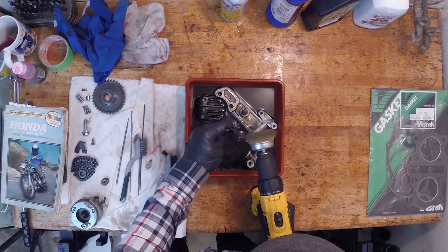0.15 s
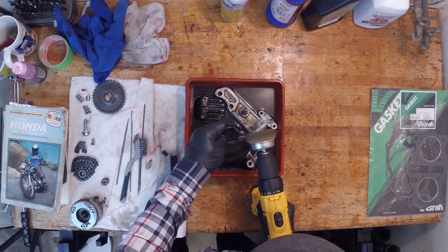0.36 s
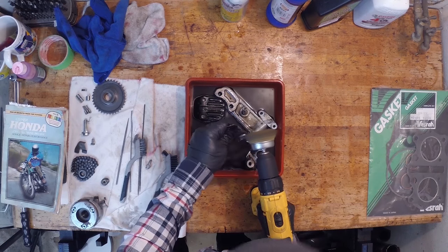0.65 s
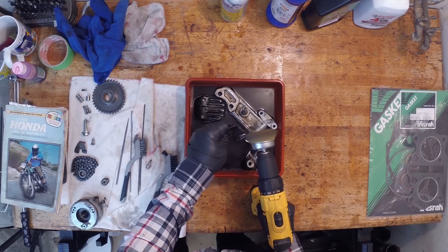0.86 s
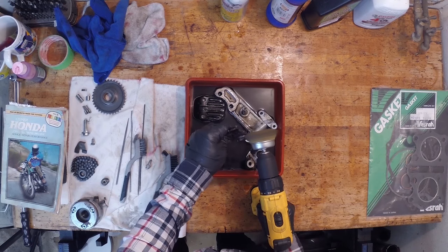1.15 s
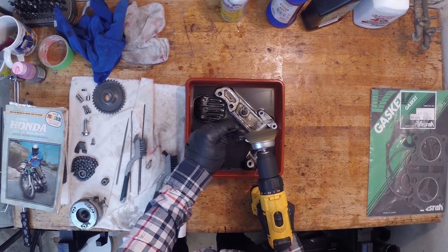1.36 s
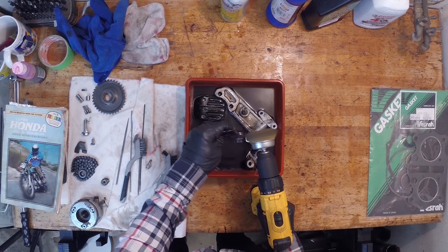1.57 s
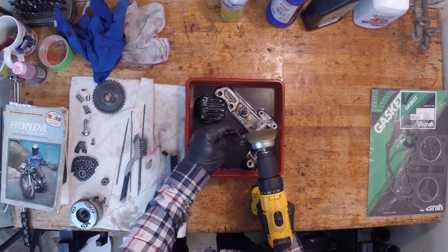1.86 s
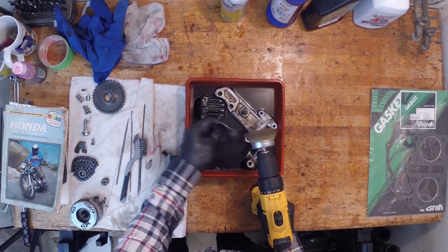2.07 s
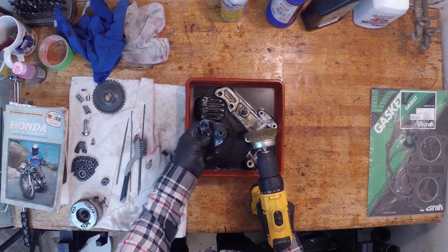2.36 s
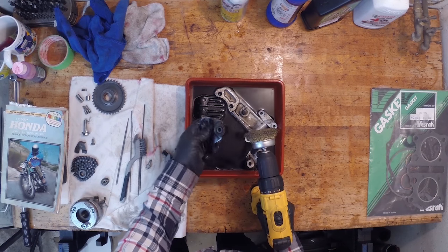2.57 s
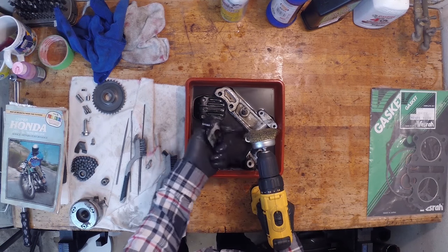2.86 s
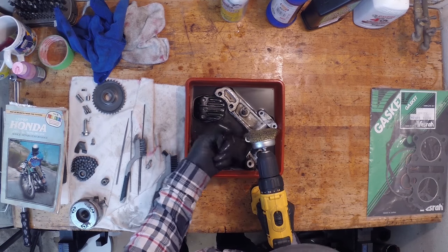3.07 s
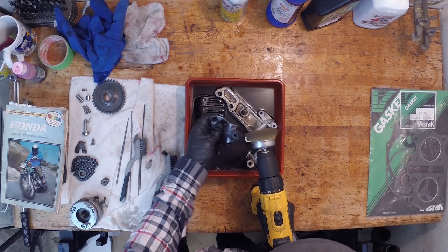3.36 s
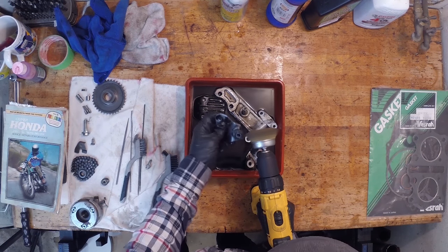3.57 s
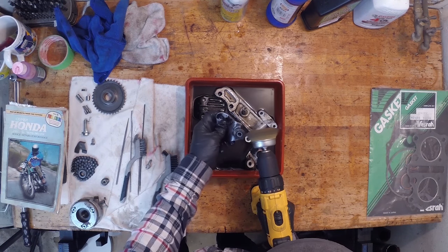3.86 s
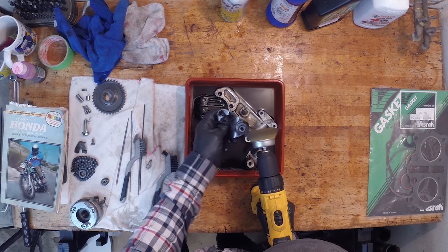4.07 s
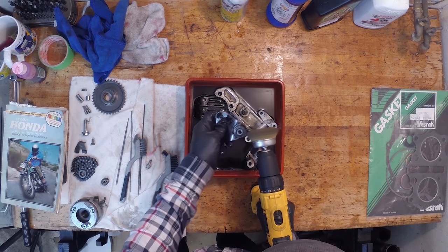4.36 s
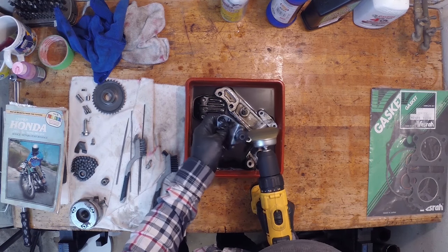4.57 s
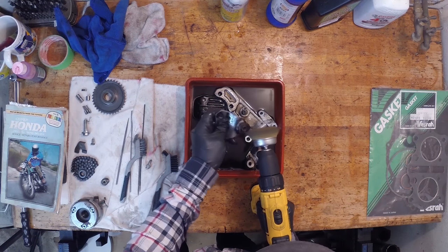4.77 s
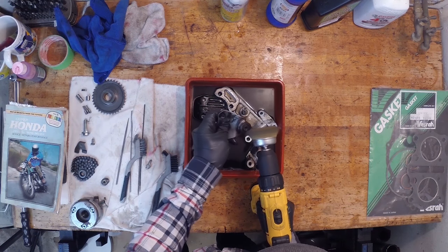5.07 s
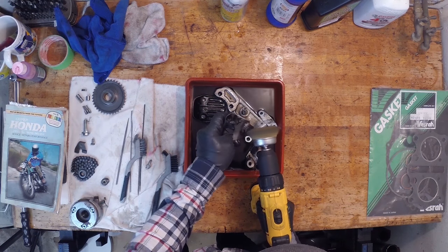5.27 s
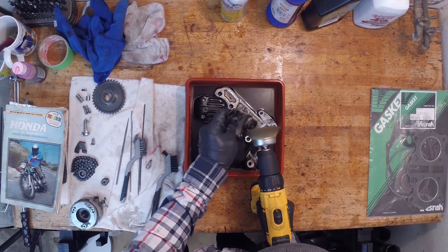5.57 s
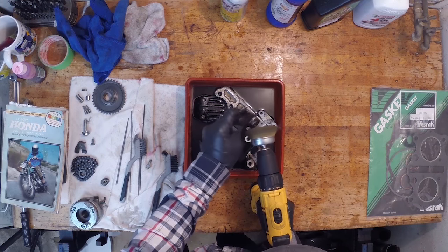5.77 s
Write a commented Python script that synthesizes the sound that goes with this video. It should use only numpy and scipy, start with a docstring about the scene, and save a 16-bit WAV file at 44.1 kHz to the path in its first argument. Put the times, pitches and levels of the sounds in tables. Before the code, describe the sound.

From 0 to about 2.4 seconds a cordless drill is already running at a steady speed, heard close in a small workshop with short reflections. Its gearbox gives a coarse, hollow midrange rattle with thin whining tones, the whine more prominent from about 1.5 seconds. Wire bristles scratch steel in a dense bright hiss with a metallic ring, and the off-centre brush throbs low through the wooden bench about nineteen times a second. At 2.38 the pitch falls almost instantly, ending in a loud sharp clack and a rapid clatter of smaller knocks until 2.45. The pause holds only low rumble, soft glove rubs near 2.9 and 3.2, and faint metal taps and clicks. At 3.41 the drill surges up quickly with small wire pings and a brief grinding whine, then runs steadily to about 6 seconds, dipping slightly in pitch as the part is pressed harder, the gear whine rising again near the end.

```python
"""In a workshop, a cordless drill spins a wire cup brush against a small steel part over a wooden bench.
Gear teeth rattle as tiny random knocks, the motor and gears whine as tones locked to its speed, wire tips
scratch as dense flicks, and the off-centre brush thumps the bench once a turn, as noise through the bench's tones.
The trigger is let go and the spindle lock clacks in short runs of contacts. After about a second of soft rubs
and small taps, the drill spins up again with a few wire pings. A low rumble lies under it all."""
import sys
import numpy as np
from scipy import signal
from scipy.fft import rfft, irfft
from scipy.io import wavfile
from scipy.ndimage import uniform_filter1d, minimum_filter1d

SR = 44100
rng = np.random.default_rng(int(sys.argv[2]) if len(sys.argv) > 2 else 0)


def dump_mix(stems):
    """Bounce the given channels to the path in sys.argv[1] as a 16-bit WAV at rate SR."""
    frames = np.atleast_2d(stems).T  # one column per channel
    limited = np.clip(frames, -1, 1)  # hard clip at full scale
    pcm = np.round(limited * 32767).astype(np.int16)
    wavfile.write(sys.argv[1], SR, pcm)


N = 260658
TIME = np.arange(N) / SR  # seconds

# All colour tables give relative levels: the sound is set to its own loudness afterwards.
# Motor and trigger: let go, the speed falls evenly; pulled again, it rises through two equal lags,
# finger and inertia.
FREE_HZ = 289.3  # motor turns a second without load
GEAR_RATIO = 15  # motor turns for one turn of the chuck
MESH_TEETH = 12  # tooth meetings in one motor turn
RELEASE_S, BRAKE_S = 2.375, .07
RESTART_S, SPIN_UP_S = 3.411, .039
# How hard the part is held to the brush, as lost motor speed, and the gear mesh tone before a small lift.
# Columns: time_s, sag_turns_per_s, mesh_db
LOAD_OVER_TIME = [(0.0, 0.6, -47), (0.22, 0.8, -43), (0.47, 1.6, -46), (0.95, 0.8, -46), (1.03, 0.8, -41),
                  (1.42, 1.8, -35), (1.55, 2.8, -35), (2.34, 0.7, -35), (3.75, 0.2, -46), (4.16, 0.6, -45),
                  (4.36, 1.4, -42), (4.86, 2.5, -47), (5.03, 5.0, -45), (5.13, 2.3, -46), (5.31, 4.6, -35),
                  (5.6, 3.4, -45), (5.74, 5.7, -35), (5.9, 6.3, -33)]

# Strength of the gear rattle, before a small lift. Columns: time_s, level_db
RATTLE_OVER_TIME = [(0, -23), (1.5, -23.5), (2.3, -22.5), (3.6, -24), (3.95, -22.5), (5.9, -23)]
# Colour of the gearbox rattle. Columns: pitch_hz, level_db
GEARBOX_COLOUR = [(120, -49.5), (200, -14.5), (330, -15.5), (430, -15.5), (650, -12), (880, -12.5),
                  (1190, -2), (1380, 0), (1620, -9), (1900, -20.5), (2800, -24.5), (5000, -19),
                  (9000, -46.5), (15000, -67)]
# Narrow peaks in the colour of the rattle. Columns: pitch_hz, width_hz, lift_db
RATTLE_PEAKS = [(823, 25, 5), (957, 45, 2.5), (1056, 45, 4), (1440, 60, 2), (1610, 30, 3), (2470, 110, 5),
                (2590, 40, 5)]

# Weaker tones of gears, motor and commutator, at full speed without load.
# Columns: multiple_of_motor_speed, level_db
WHINE_TONES = [(4, -43.5), (5, -51), (6, -44.5), (7, -46), (9, -48), (11, -56.5), (13.37, -49.5),
               (13.91, -48), (15, -43), (20, -46.5), (21, -53), (25, -55.5), (33, -53), (35, -55.5),
               (40, -58), (44, -64.5), (45, -62)]
# The motor hum: level without load, and gain for each turn a second of sag
HUM_DB, HUM_PER_SAG_DB = -44.5, 1.27

# Colour of the wire tips scratching steel. Columns: pitch_hz, level_db
WIRE_COLOUR = [(500, -18.5), (1800, -7), (2800, -10), (3150, 5.5), (3800, 2.5), (4200, -3), (4700, -0.5),
               (5600, -2), (6100, -8), (8400, -7.5), (9200, -14), (11500, -18), (12900, -29), (13100, -31),
               (15200, -27.5)]
# Ringing of the brush cup and the part. Columns: pitch_hz, width_hz, energy_db
CUP_MODES = [(3330, 110, 0), (3578, 80, 5.5), (3110, 71, 1), (4580, 100, -12), (5740, 44, -6),
             (6686, 65, -6), (7260, 80, -13.5)]
# The brush: overall setting before its two layers are balanced, and gain for each turn a second of sag
SCRATCH_DB, SCRATCH_PER_SAG_DB = -33, 0.16

# Ringing of the bench and tray. Columns: pitch_hz, width_hz, energy_db
BENCH_MODES = [(80.4, 29, -11.5), (96.2, 16, 1.5), (161, 19, 2.5), (293, 30, -23), (326.3, 11.7, -8.5),
               (353, 13, 4.5), (620, 110, -16.5)]
# Slow shaking from the chuck and planet gears. Columns: multiple_of_motor_speed, level_db
SHAFT_WOBBLE = [(.1333, -13), (.2, -13), (.2727, -2), (.3333, 0), (.6, -12), (.8667, -17), (1.1333, -12),
                (1.2667, -13)]
# The shaking swells and ebbs in a slow beat: mean level, depth, and time of one crest
SHAKE_DB, BEAT_DB, BEAT_CREST_S = -32, 2.5, 1.42
MOTOR_TURNS_PER_BEAT = 100

# Blows of the spindle lock and rebounds of the slack gears; the tilt is for the first contact of each.
# Columns: start_s, level_db, treble_tilt_db_per_octave
LOCK_BLOWS = [(2.3912, -1, 3), (2.398, -10.5, 1), (2.406, -12, -3.5), (2.411, -17.5, -1.5),
              (2.424, -18, -5.5), (2.431, -11.5, 0.5), (2.452, -21.5, -6)]
# Colour of those blows. Columns: pitch_hz, level_db
LOCK_COLOUR = [(40, -12), (90, 1), (150, 0), (240, -7), (345, 1), (500, -8), (750, -3), (1000, -2),
               (1450, 3), (1950, -9), (2950, -2), (3700, -8), (4800, -6), (8000, -25), (15000, -48)]
# Each blow is a quick run of contacts: their spacing, and treble lost at each step (dB per octave)
CONTACT_GAP_S, DULLING_DB = 0.0012, 1.5

# Light taps and clicks of the part and the trigger, before a shared cut.
# Columns: start_s, level_db, pitch_hz, t60_s
LIGHT_TAPS = [(2.589, -40, 8000, .012), (2.588, -43, 3300, .04), (2.905, -50, 8500, .03),
              (3.06, -50, 2000, .033), (3.328, -48, 3150, 0.15), (3.388, -41, 1400, 0.033),
              (3.403, -39, 1500, .033)]
TAP_WIDTH = 0.19  # share of the pitch
# The first wires catch the part and ping, before the same cut. Columns: start_s, level_db
WIRE_CATCHES = [(3.4142, -28.5), (3.427, -29), (3.434, -24.5)]
PING_HZ, PING_T60_S = 3820, .065
PING_WIDTH = .044  # share of the pitch
# Colour of a light metal contact. Columns: pitch_hz, level_db
CONTACT_COLOUR = [(300, 16.0), (1200, 7), (5000, -5.5), (15000, -28)]

# Rubs of the gloved hand turning the part. Columns: middle_s, length_s, level_db
GLOVE_RUBS = [(2.86, 0.35, -60), (3.221, 0.28, -65)]
# Colour of the glove rubbing the part. Columns: pitch_hz, level_db
RUB_COLOUR = [(180, -29.5), (300, 2.5), (416, -7.5), (459, -0.5), (507, -3.5), (568, 0), (959, -12),
              (1190, 7), (2600, -21.5), (3220, -10), (7540, -33.5), (11400, -36), (15000, -39)]

# Colour of the workshop background. Columns: pitch_hz, level_db
RUMBLE_COLOUR = [(15, -15.5), (35, -7), (52, -0.5), (80, -1.5), (120, 2.5), (160, -4.5), (210, -15),
                 (400, -20.5), (1000, -27.5), (4000, -39.5), (15000, -54)]
RUMBLE_DB = -44.5
# How long the workshop's echoes last. Columns: pitch_hz, t60_s
ROOM_DECAY = [(100, 0.14), (400, 0.35), (1300, 0.25), (5000, 0.19), (12000, 0.36)]
EDGE_HZ = 15280  # top of the band that is kept


def motor():
    """The trigger sets a share of full speed; pressing the part on the brush takes some turns away."""
    braking = np.clip(1 - (TIME - RELEASE_S) / BRAKE_S, 0, 1)
    lags = np.maximum(TIME - RESTART_S, 0) / SPIN_UP_S
    starting = 1 - (1 + lags) * np.exp(-lags)
    sag, _ = curves(LOAD_OVER_TIME)
    return np.maximum(braking, starting), sag


def gears(pace, turns, level_db, rate=1500, spread_db=-0.5, throb=0.04, trim_db=0.5):
    """Teeth knock through their backlash with a peaky, hollow colour, a little harder once a chuck turn."""
    throbbing = 1 + throb * np.cos(2 * np.pi * turns)
    knocks = impacts(rate * pace, spread_db) * throbbing
    rattle = steady(colour(knocks, GEARBOX_COLOUR, RATTLE_PEAKS))
    return amp(level_db + trim_db) * pace * rattle


def whine(speed, pace, waver=.4, waver_hz=7, jitter=.25, per_sag_db=-.5, mesh_db=2, mesh_unrest=.28,
          spin_up_db=-32):
    """Tones locked to the motor shaft; each wavers, and the weaker ones give way as the load grows."""
    angle = 2 * np.pi * np.cumsum(speed) / SR

    def line(order, unrest):
        """One shaft tone, unsteady in strength and timing."""
        wander = unrest * jitter * drift(waver_hz) + 2 * np.pi * rng.random()
        strength = 1 + unrest * waver * drift(waver_hz)
        return np.sqrt(2) * strength * np.cos(order * angle + wander)

    sag, mesh = curves(LOAD_OVER_TIME)
    mesh_tone = amp(mesh + mesh_db) * line(MESH_TEETH, mesh_unrest)
    hum = amp(HUM_DB + HUM_PER_SAG_DB * sag) * line(1, .5)
    others = amp(per_sag_db * sag) * sum(amp(db) * line(order, 0.93) for order, db in WHINE_TONES)

    # the teeth grind while the motor gathers speed, most as their pitch crosses the ring of the cup
    gathering = uniform_filter1d(np.gradient(speed) * SR, 2000)
    torque = np.clip(gathering / 1000, 0, 1) ** .5
    crossing = 1 / (1 + ((MESH_TEETH * speed - 3150) / 650) ** 2)
    rough_tone = (1 + .5 * drift(60)) * np.cos(MESH_TEETH * angle + .9 * drift(60))
    grind = torque * crossing * rough_tone
    run_up = pace ** 4
    return amp(spin_up_db) * grind + run_up * (mesh_tone + hum + others)


def brush(pace, turns, scratch_db, rate=9000, spread_db=2.5, throb=.09, scratch_trim_db=4.5, ring_db=-3):
    """Wire tips flick over the steel: a dense scratch, and the ring of cup and part."""
    throbbing = 1 + throb * np.cos(2 * np.pi * turns)
    flicks = impacts(rate * pace, spread_db) * throbbing
    scratch_fade = np.minimum(1.5 * pace, 1) ** 2
    scratch = amp(scratch_trim_db) * scratch_fade * steady(colour(flicks, WIRE_COLOUR))
    ringing = amp(ring_db) * pace ** 2 * steady(ring(flicks, CUP_MODES))
    return amp(scratch_db) * (scratch + ringing)


def bench(pace, turns, sharp=4, thump_db=-3.5, thump_beat=0.28, waver=.2, swing=0.11):
    """The off-centre brush shoves the bench once a turn, and the slow shafts shake it in a slow beat."""
    turns_from_crest = turns - np.interp(BEAT_CREST_S, TIME, turns)
    beats = turns_from_crest * GEAR_RATIO / MOTOR_TURNS_PER_BEAT
    swell_db = BEAT_DB * np.cos(2 * np.pi * beats) + 1.3 * drift(6)

    push = np.cos(2 * np.pi * turns)
    shove = np.exp(sharp * push / 2) * rng.standard_normal(N)
    rumble_cut = signal.butter(2, 45, "high", fs=SR, output="sos")
    thump = steady(signal.sosfilt(rumble_cut, ring(shove * pace ** .6, BENCH_MODES)))

    shafts = np.zeros(N)
    for order, db in SHAFT_WOBBLE:
        turning = np.cos(2 * np.pi * order * GEAR_RATIO * turns)
        shafts += amp(db) * (1 + waver * drift(3.4)) * turning
    wobble = steady(pace ** 4 * shafts * (1 + swing * push))

    swelling_thump = amp(thump_db + thump_beat * swell_db) * thump
    return amp(SHAKE_DB) * (swelling_thump + amp(swell_db) * wobble)


def clacks(chatter_db=-11, body_s=2.402, body_t60=0.27, body_db=-19.0, body_tilt_db=-5, rattly_db=-12, count=4):
    """The lock's hard contacts also sound in the rattle's colour; the heavy brush rebounds and shudders the drill."""
    out, t = np.zeros(N), TIME[:SR // 4]
    for s, db, tilt in LOCK_BLOWS:
        for k in range(count):
            # one hard contact, then a few milliseconds of chatter
            crack = amp(chatter_db) * rng.choice([-1, 1], len(t)) * amp(-60 * t / .012)
            crack[0] = rng.choice([-1, 1])
            blow = colour(crack, LOCK_COLOUR, tilt_db=tilt - DULLING_DB * k)
            rattly = colour(crack, GEARBOX_COLOUR, RATTLE_PEAKS)
            both = blow / abs(blow).max() + amp(rattly_db) * rattly / abs(rattly).max()
            add(out, s + CONTACT_GAP_S * k, amp(db) * both)
    shudder = colour(rng.standard_normal(len(t)), LOCK_COLOUR, tilt_db=body_tilt_db)
    add(out, body_s, amp(body_db) * unit(shudder) * amp(-60 * t / body_t60))
    return out


def taps(trim_db=-7):
    """The part and the trigger tap in the pause; then the first wires ping."""
    out = np.zeros(N)
    for s, db, hz, t60 in LIGHT_TAPS:
        add(out, s, contact(db + trim_db, hz, t60, TAP_WIDTH))
    for s, db in WIRE_CATCHES:
        add(out, s, contact(db + trim_db, PING_HZ, PING_T60_S, PING_WIDTH))
    return out


def contact(db, hz, t60, width):
    """A light metal contact: a short scrape through one resonance, dying away."""
    t = TIME[:SR // 4]
    resonance = [(hz, 2 * width * hz, 22)]
    scrape = unit(colour(rng.standard_normal(len(t)), CONTACT_COLOUR, resonance))
    return amp(db) * scrape * amp(-60 * t / t60)


def handling():
    """Glove and part rub softly while the drill rests: tiny blows that swell and fade."""
    level = sum(amp(db) * np.exp(-(2 * (TIME - s) / length) ** 2) for s, length, db in GLOVE_RUBS)
    return level * unit(colour(impacts(3000, 3), RUB_COLOUR))


def background():
    """The workshop's steady rumble: random noise, strongest in the bass."""
    return amp(RUMBLE_DB) * unit(colour(rng.standard_normal(N), RUMBLE_COLOUR))


def room(x, wet_db=-7):
    """Dense reflections from the bench top and near walls, each band dying at its own speed."""
    echoes = rng.standard_normal(SR // 2) * (TIME[:SR // 2] > .004)
    hz, t, bands = signal.stft(echoes, SR, nperseg=256)
    fading = amp(-60 * t / read(ROOM_DECAY, hz)[:, None])
    tail = signal.istft(bands * fading, SR, nperseg=256)[1]
    wet = signal.oaconvolve(x, tail / np.linalg.norm(tail))[:N]
    return (x + amp(wet_db) * wet) / np.sqrt(1 + amp(2 * wet_db))


def impacts(rate, spread_db):
    """Random tiny blows, rate a second, of uneven size and sign."""
    size = amp(spread_db * np.minimum(rng.exponential(1, N), 4))
    return size * rng.choice([-1, 1], N) * (rng.random(N) < rate / SR)


def ring(x, modes):
    """Damped tones struck by x: a wider one dies sooner, and dB sets the energy of each."""
    t = TIME[:SR // 4]
    response = np.zeros(len(t))
    for hz, width, db in modes:
        decay = np.exp(-np.pi * width * t)
        response += amp(db) * np.sqrt(width) * decay * np.sin(2 * np.pi * hz * t)
    return signal.oaconvolve(x, response)[:N]


def colour(x, points, bumps=(), tilt_db=0, size=4096):
    """Filter that never sounds early: a spectrum, optional peaks and a tilt about 2 kHz."""
    hz = abs(np.fft.fftfreq(size, 1 / SR))
    db = read(points, hz) + tilt_db * np.log2(np.maximum(hz, 500) / 2000)
    for centre, width, lift in bumps:
        db = db + lift / (1 + (2 * (hz - centre) / width) ** 2)
    # this choice of phase puts the energy as early as it can be
    spectrum = np.exp(np.conj(signal.hilbert(np.log(amp(db)))))
    response = np.fft.ifft(spectrum).real
    return signal.oaconvolve(x, response)[:len(x)]


def drift(hz):
    """Slow chance of rms 1, mostly up to about hz changes a second."""
    f = np.fft.rfftfreq(N, 1 / SR)
    return unit(irfft(rfft(rng.standard_normal(N)) / (1 + (f / hz) ** 2), N))


def read(points, hz):
    """A table over pitch, joined by straight lines on a log-frequency axis."""
    f, value = np.transpose(points)
    return np.interp(np.log(hz + 1), np.log(f), value)


def curves(rows):
    """Every column of a timed table, at the sample rate."""
    s, *columns = np.transpose(rows)
    return [np.interp(TIME, s, c) for c in columns]


def amp(db):
    """Decibels to a plain factor."""
    return 10 ** (np.asarray(db) / 20)


def unit(x):
    """Scales x to rms 1."""
    return x / np.sqrt(np.mean(x ** 2) + 1e-20)


def steady(x):
    """Scales x by its spread over the first two seconds, while the drill runs."""
    return x / np.std(x[:2 * SR])


def add(mix, s, sound):
    """Lays a sound into the mix from s seconds on."""
    part = mix[round(s * SR):][:len(sound)]
    part += sound[:len(part)]


def scene(coast_db=-5, bite_db=2):
    """One motor speed drives the gears, whine, brush and bench; the other sounds are laid beside them."""
    pace, sag = motor()
    speed = pace * (FREE_HZ - sag)
    turns = np.cumsum(speed) / SR / GEAR_RATIO  # of the chuck

    # wires bite harder while the motor pulls away; coasting, gears and wires lose their load
    pull = np.tanh(uniform_filter1d(np.gradient(speed) * SR, 400) / 2000)
    rising, slowing = np.maximum(pull, 0), np.maximum(-pull, 0)
    gear_db = curves(RATTLE_OVER_TIME)[0] + coast_db * slowing
    scratch_db = SCRATCH_DB + SCRATCH_PER_SAG_DB * sag + bite_db * rising + coast_db * slowing

    airborne = gears(pace, turns, gear_db) + brush(pace, turns, scratch_db) + clacks() + taps()
    mix = room(airborne) + whine(speed, pace) + bench(pace, turns) + handling() + background()
    return mix[None]


def record(dry):
    """A fast limiter holds the peaks under full scale; then a filter takes off the highest treble."""
    allowed = np.minimum(1, .97 / (abs(dry) + 1e-9))
    gain = uniform_filter1d(minimum_filter1d(allowed, 65), 65)
    treble_cut = signal.firwin(1023, EDGE_HZ, window=("kaiser", 9), fs=SR)
    return signal.oaconvolve(dry * gain, treble_cut[None], "same")


dry = scene()
out = record(dry)
dump_mix(out)
```